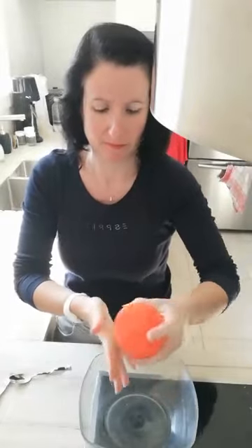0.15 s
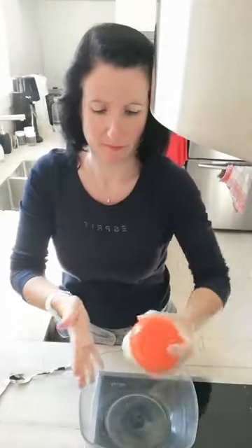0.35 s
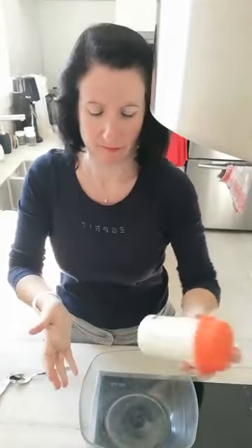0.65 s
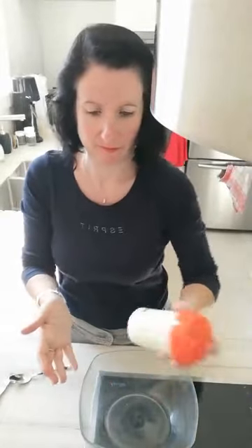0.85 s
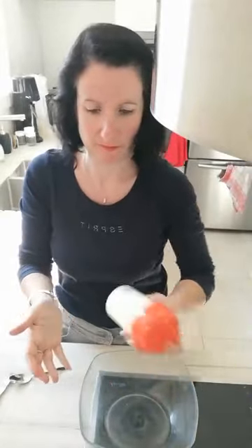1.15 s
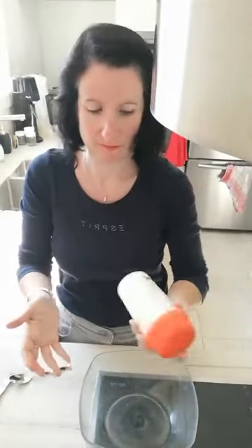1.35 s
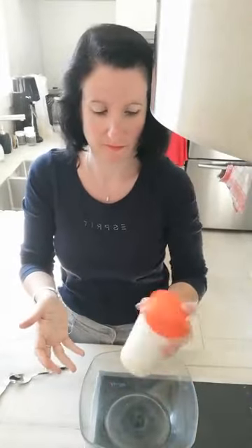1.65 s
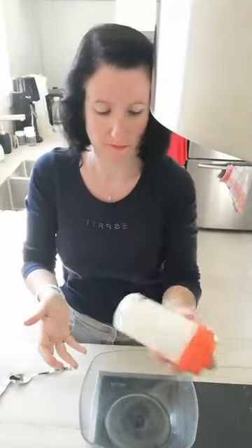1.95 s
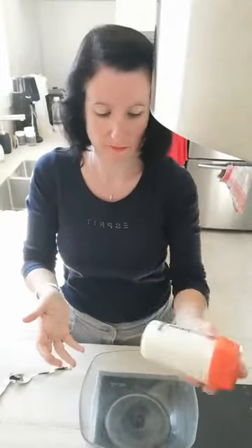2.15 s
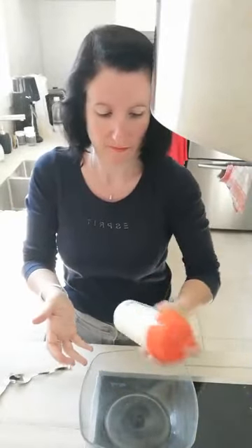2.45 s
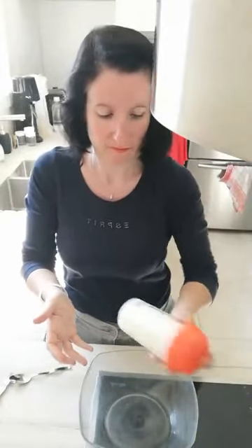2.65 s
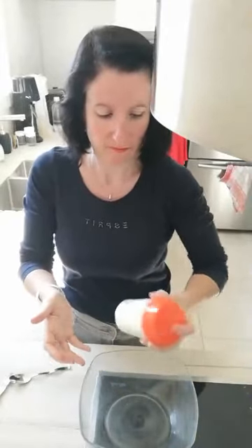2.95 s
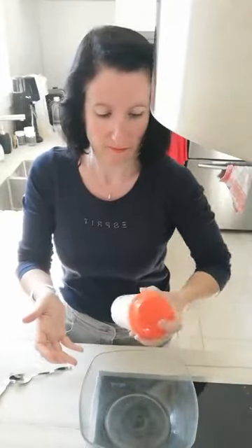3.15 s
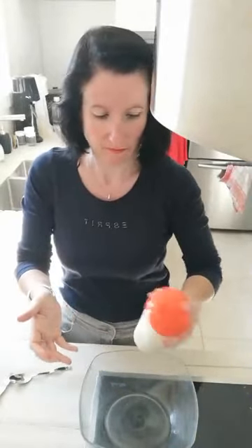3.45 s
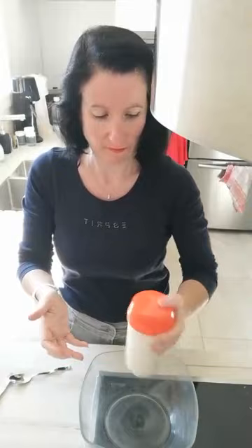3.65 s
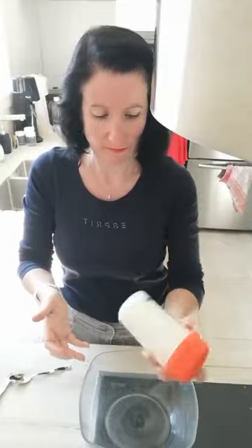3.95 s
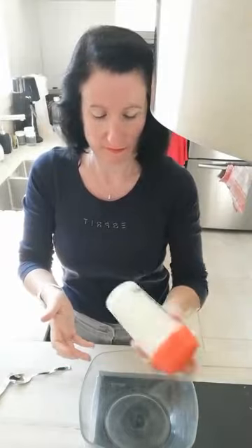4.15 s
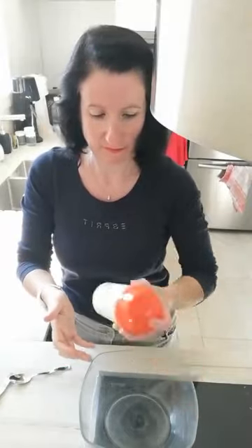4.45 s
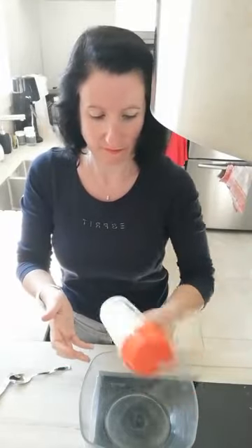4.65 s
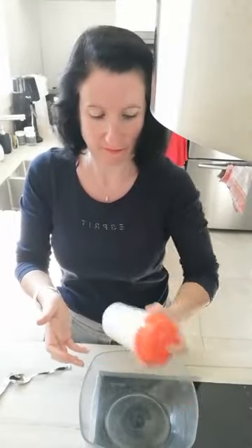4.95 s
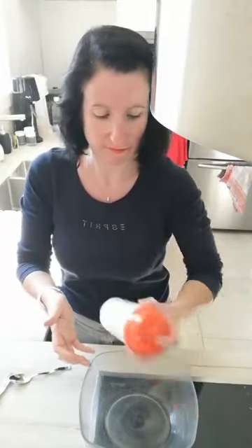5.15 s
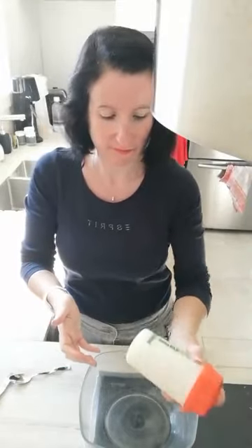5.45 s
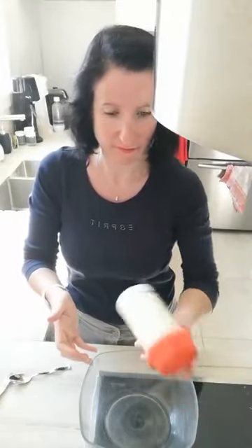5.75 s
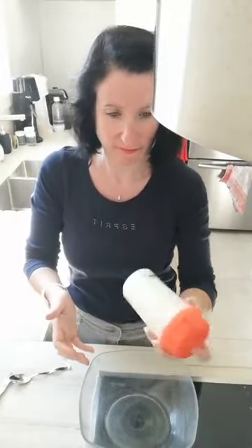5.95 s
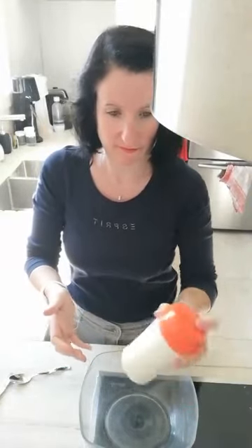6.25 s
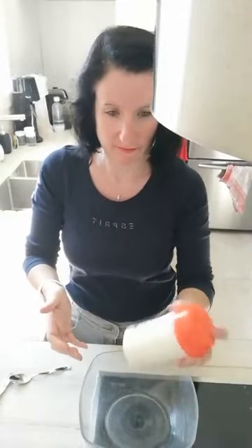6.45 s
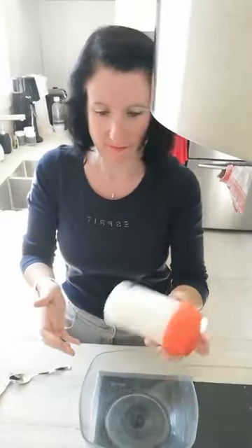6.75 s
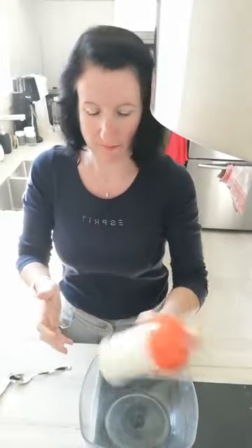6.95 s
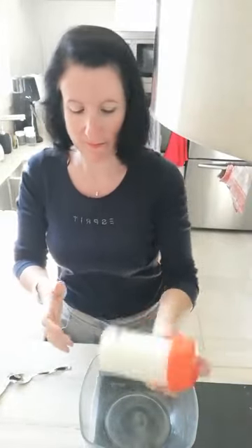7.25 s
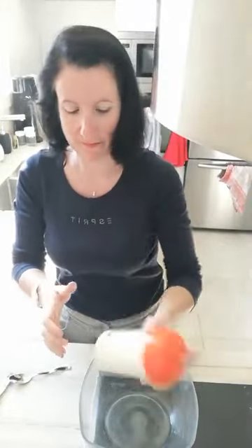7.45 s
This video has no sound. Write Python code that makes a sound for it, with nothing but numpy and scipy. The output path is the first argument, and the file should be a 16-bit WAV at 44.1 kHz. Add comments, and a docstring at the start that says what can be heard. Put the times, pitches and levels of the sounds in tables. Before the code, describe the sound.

Rapid wet sloshing inside a closed plastic bottle, with hollow knocks and fine spray, in a kitchen with a quiet appliance hum.

```python
"""A closed plastic shaker bottle is shaken by hand about five times a second in a kitchen.
From start to end an appliance hums on slightly wavering tones over shaped room noise. The first splash is
there at once; stroke after stroke, liquid breaks into spray made of random clicks and rising bubble chirps.
Sparse sharp ticks and sloshing wall modes join in, and from half a second on slugs of liquid knock out damped
tones of trapped air, some with a low thud. Near the end the splashes thin out briefly, then return."""
import sys
import numpy as np
from scipy import signal
from scipy.fft import rfft, irfft
from scipy.io import wavfile
from scipy.ndimage import uniform_filter1d

SR = 44100
rng = np.random.default_rng(int(sys.argv[2]) if len(sys.argv) > 2 else 0)


def unload_audio(sound):
    """Save the sound as a 16-bit wav file, at the path given as the first command line argument."""
    columns = np.transpose(np.atleast_2d(sound))
    # keep every value between -1 and 1, then stretch to whole-number steps
    steps = np.round(np.clip(columns, -1, 1) * 32767)
    wavfile.write(sys.argv[1], SR, steps.astype(np.int16))


N = 334426  # length [samples]

# appliance hum: (frequency [Hz], level [dB rms], waver [dB rms])
HUM_TONES = [(36, -68, 1.5), (100, -50.5, .35), (180.5, -62.5, 2), (200, -63.5, 1.5), (300, -70, 3)]
# spectrum of the room noise: (frequency [Hz], relative density [dB])
ROOM_NOISE_SPECTRUM = [(22, -18), (36, -1), (66, 8.5), (88, 4.5), (120, 9.5), (138, 3), (160, 12),
                       (235, -4.5), (320, -45), (700, 12), (1000, -9), (14400, -45)]
# liquid hitting an end of the bottle, one row a stroke: (peak time [s], level [dB], rise [s], fall [s])
SPLASHES = [(-0.0, -44.5, 0.0044, 0.039), (0.099, -39.5, 0.015, 0.068), (0.261, -50, 0.021, 0.046),
            (0.394, -45.5, 0.02, 0.15), (0.483, -45.3, 0.058, 0.084), (0.557, -39, 0.037, 0.11),
            (0.624, -41, 0.015, 0.013), (0.704, -41, 0.058, 0.05), (0.76, -39, 0.022, 0.093),
            (0.824, -51, 0.013, 0.046), (0.899, -42.5, 0.048, 0.087), (0.965, -36, 0.0066, 0.065),
            (1.1, -41.5, 0.033, 0.082), (1.179, -34, 0.0069, 0.047), (1.331, -40, 0.072, 0.029),
            (1.39, -44, 0.029, 0.046), (1.533, -40, 0.064, 0.045), (1.604, -41, 0.014, 0.033),
            (1.728, -44.5, 0.044, 0.019), (1.83, -48, 0.069, 0.02), (1.913, -43, 0.02, 0.019),
            (2.019, -46.5, 0.04, 0.049), (2.118, -41.5, 0.0087, 0.051), (2.196, -51.5, 0.031, 0.057),
            (2.266, -46.5, 0.068, 0.16), (2.39, -46.5, 0.081, 0.039), (2.458, -47.5, 0.031, 0.088),
            (2.565, -42, 0.067, 0.06), (2.699, -43, 0.031, 0.089), (2.798, -48.5, 0.031, 0.12),
            (2.914, -43, 0.08, 0.052), (3.017, -49, 0.021, 0.19), (3.112, -40, 0.031, 0.069),
            (3.263, -47.6, 0.02, 0.106), (3.366, -44.5, 0.046, 0.07), (3.484, -43.9, 0.057, 0.073),
            (3.606, -46.0, 0.036, 0.022), (3.727, -42, 0.027, 0.1), (3.834, -42.5, 0.038, 0.039),
            (3.951, -44.5, 0.038, 0.032), (4.037, -45, 0.036, 0.037), (4.14, -43, 0.03, 0.016),
            (4.224, -44.5, 0.015, 0.037), (4.331, -40, 0.0043, 0.019), (4.44, -45.7, 0.008, 0.011),
            (4.593, -47.5, 0.081, 0.043), (4.705, -47, 0.081, 0.1), (4.777, -39.5, 0.02, 0.036),
            (4.89, -41, 0.016, 0.042), (5.0, -45, 0.076, 0.046), (5.107, -40.5, 0.053, 0.055),
            (5.228, -44.2, 0.037, 0.026), (5.312, -42.5, 0.078, 0.057), (5.452, -45, 0.034, 0.068),
            (5.54, -42, 0.033, 0.055), (5.663, -45.8, 0.048, 0.066), (5.738, -45.0, 0.021, 0.15),
            (5.904, -40.5, 0.016, 0.023), (6.011, -44.5, 0.064, 0.053), (6.111, -40.5, 0.03, 0.04),
            (6.197, -48.5, 0.032, 0.11), (6.295, -48, 0.064, 0.038), (6.385, -43, 0.0043, 0.043),
            (6.505, -46, 0.036, 0.029), (6.607, -51, 0.068, 0.023), (6.705, -45.5, 0.02, 0.03),
            (6.783, -56, 0.069, 0.102), (6.857, -55, 0.008, 0.12), (7.012, -54, 0.091, 0.035),
            (7.067, -46.5, 0.016, 0.045), (7.173, -48, 0.013, 0.065), (7.256, -44.5, 0.025, 0.06),
            (7.354, -46.5, 0.015, 0.045), (7.458, -47.6, 0.089, 0.096), (7.536, -48.5, 0.01, 0.089)]
# swirl between the splashes: (time [s], spray level [dB], coarse drops over fine ones [dB])
# the last column also balances the splashes
SWIRL = [(0.0, -40.5, -16), (0.3, -66.5, -0.5), (0.45, -57, -0.6), (1.5, -48.5, -2), (2.2, -54, 2.2),
         (3.0, -49.5, 0.5), (3.699, -55, 0.5), (4.4, -49.5, -0.5), (5.0, -51, 2.5), (6.0, -55, 0),
         (7.0, -51.5, 1.7), (7.58, -69, -0.1)]
# level of the wall's ringing as the shaking grows and slackens: (time [s], level [dB])
WALL_VIGOUR = [(0, -43.5), (.35, -53), (.7, -47.5), (1.7, -50.5), (2.6, -48), (3.6, -48), (4.3, -46.5),
               (5.2, -48), (6.3, -46.5), (7.58, -48)]
# low modes of the bottle wall: (frequency [Hz], width of each of two passes [Hz], relative level [dB])
WALL_MODES = [(445.6, 111, -3.5), (616.7, 155, -1), (636, 62, -6.5), (743.4, 137, 10.5), (780, 32, 4.5)]
# single sharp ticks within the splashes: (time [s], nominal level [dB], pitch [Hz])
TICKS = [(0.096, -34, 4400), (0.48, -38, 1480), (0.763, -32, 2440), (1.180, -34, 1690), (2.799, -36, 3200),
         (6.381, -37.5, 1670), (6.399, -44, 1960)]
# partials of a tick: (multiple of the pitch [ratio], relative level [dB])
TICK_PARTIALS = [(1, -1), (1.25, -6.5), (1.9, -7)]
# slugs of liquid knocking the bottle: (peak time [s], ring of the trapped air [dB], low thud [dB])
KNOCKS = [(0.497, -35, -53), (0.601, -31.5, -63), (0.712, -38, -53), (0.79, -42, -53), (0.994, -40, -51),
          (1.187, -38, -70), (1.229, -39.5, -65), (1.405, -38, -71), (1.73, -45, -45), (1.916, -33, -46),
          (2.045, -34, -67), (2.389, -36, -46), (2.566, -39, -57), (2.596, -43, -45), (2.7, -31.5, -58),
          (2.939, -34, -52), (3.113, -42, -55), (3.167, -36.5, -54), (3.279, -37.5, -51), (3.364, -35, -73),
          (3.728, -43, -53), (3.803, -34.3, -50), (3.837, -31, -58), (3.959, -51.1, -44.5),
          (4.141, -57, -38.5), (4.338, -57, -42), (4.584, -39, -56), (4.667, -40, -52), (4.691, -39.5, -56),
          (4.779, -40, -53), (4.891, -33.5, -41.5), (4.989, -36.5, -70), (5.114, -34, -48.5),
          (5.144, -41, -64), (5.336, -29, -50), (5.466, -53, -46), (5.535, -35.1, -49), (5.571, -34, -56),
          (5.663, -38.5, -51), (5.767, -37.5, -51), (5.913, -38.5, -52), (6.002, -47, -54),
          (6.114, -36, -53), (6.354, -40, -56), (6.651, -38, -60), (6.813, -40, -62), (6.852, -39.5, -56),
          (7.258, -40, -58), (7.299, -43, -44.5)]
# what a knock rings: (frequency [Hz], level relative to the ring [dB], level relative to the thud [dB])
KNOCK_MODES = [(386.5, -45, 1), (465, -25, -6.5), (570.3, -11.5, -4), (757.6, -2, -26), (814.6, -9, -32)]
# spectrum of the droplet patter: (frequency [Hz], relative density [dB])
SPRAY_SPECTRUM = [(250, -21), (330, -17), (900, -20.5), (1060, -18.5), (1900, -20), (2730, -12.5),
                  (4500, -16), (6830, -19), (10300, -10), (12500, -16.5), (14400, -23.5)]
# higher wall modes struck by drops: (frequency [Hz], width [Hz], relative level [dB])
HIGH_WALL_MODES = [(1540, 620, -3), (2110, 117, -1), (6140, 470, 0)]

ROOM_NOISE_DB = -57.5
KNOCK_DETUNE = 0.02  # rms ratio; the air pocket changes size from knock to knock
KNOCK_RISE_S, KNOCK_T60_S = 0.00805, 0.0502  # rise time constant; decay by 60 dB at 750 Hz
REBOUND_S, REBOUND_DB = 0.02, -9.5  # the slug folds over and strikes once more
EDGE_HZ = 14330  # upper limit of the band


def gain_of(db):
    """Turns dB into an amplitude factor."""
    return 10 ** (np.asarray(db) / 20)


def evened(x):
    """Brings x to rms 1."""
    return x / np.sqrt(np.mean(x ** 2) + 1e-20)


def add(mix, s, sound):
    """Lays a sound into the mix from s seconds on, cut at the end of the mix."""
    part = mix[max(round(s * SR), 0):][:len(sound)]
    part += sound[:len(part)]


def coloured(x, points):
    """Weights the spectrum of x by points (Hz, dB), joined on a log frequency axis, at rms 1."""
    f, db = np.transpose(points)
    hz = np.fft.rfftfreq(len(x), 1 / SR)
    weight = gain_of(np.interp(np.log(hz + 1), np.log(f + 1), db))
    return evened(irfft(rfft(x) * weight, len(x)))


def ring(x, modes):
    """Sum of damped resonances (Hz, width Hz, dB) driven by x; a wider one dies sooner."""
    total = 0
    for hz, width, db in modes:
        pole = np.exp((2j * hz - abs(width)) * np.pi / SR)
        total = total + gain_of(db) * 2 * signal.lfilter([1 - abs(pole)], [1, -pole], x + 0j).imag
    return total


def drift(per_s):
    """Slow chance of rms 1 that changes about per_s times a second."""
    size = max(round(SR / per_s), 1)
    return evened(uniform_filter1d(uniform_filter1d(rng.standard_normal(N), size), size))


def droplets(per_s, spread_db):
    """Random clicks of either sign at rms 1; positive spread makes a few large, negative a few small."""
    size = gain_of(spread_db * np.minimum(rng.exponential(1, N), 4))
    sign = rng.choice([-1., 1.], N)
    return evened(size * sign * (rng.random(N) < per_s / SR))


def kitchen():
    """Appliance tones, each wavering a little in level, over room noise."""
    t = np.arange(N) / SR
    hum = np.zeros(N)
    for hz, db, waver_db in HUM_TONES:
        level = gain_of(db + waver_db * drift(5.2))
        hum += level * np.sqrt(2) * np.sin(2 * np.pi * (hz * t + rng.random()))
    return hum + gain_of(ROOM_NOISE_DB) * coloured(rng.standard_normal(N), ROOM_NOISE_SPECTRUM)


def room(x, t60=0.2):
    """A decaying tail of random reflections."""
    t = np.arange(SR // 2) / SR
    tail = rng.standard_normal(len(t)) * gain_of(-60 * t / t60) * (t > .004)
    return signal.fftconvolve(x, tail / np.linalg.norm(tail))[:N]


def strokes():
    """Amplitude of the fine and of the coarse spray: swirl plus the rise and fall of each splash."""
    s, spray_db, coarse_db = np.transpose(SWIRL)
    clock = np.arange(N) / SR
    power = gain_of(2 * np.interp(clock, s, spray_db))
    t = np.arange(SR // 2) / SR
    for at, db, rise, fall in SPLASHES:
        rise, fall = max(rise, .001), max(fall, .005)
        swell = np.minimum(t / rise, 1) ** 0.93
        decay = np.exp(-(np.maximum(t - rise, 0) / fall) ** 1.15)
        add(power, at - rise, (swell * decay * gain_of(db)) ** 2)
    fine = np.sqrt(power)
    return fine, fine * gain_of(np.interp(clock, s, coarse_db))


def wall():
    """Sloshing liquid keeps the low modes ringing; their pitch wanders as the air pocket changes shape."""
    _, coarse = strokes()
    vigour = gain_of(np.interp(np.arange(N) / SR, *np.transpose(WALL_VIGOUR)))
    drive = droplets(per_s=700, spread_db=1.5)
    modes = np.zeros(N)
    for hz, width, db in WALL_MODES:
        resonance = [(hz, width, 0)]
        modes += gain_of(db) * ring(ring(drive, resonance), resonance)
    # reading faster or slower bends the pitch
    warped = np.arange(N) + np.cumsum(.014 * drift(12))
    return vigour * evened(coarse) ** 0.66 * evened(np.interp(warped, np.arange(N), modes))


def ticks():
    """A click and two quick rebounds, each a noisy chord that dies by 60 dB in 36 ms."""
    out, t = np.zeros(N), np.arange(SR // 20) / SR
    for at, db, hz in TICKS:
        noise = rng.standard_normal(len(t))
        tone = sum(gain_of(mode_db) * np.sin(2 * np.pi * ratio * hz * t) for ratio, mode_db in TICK_PARTIALS)
        for late, rebound_db in [(0, -3), (.006, -15), (.017, -11)]:  # (s, dB)
            decay = gain_of(db + rebound_db - 60 * t / 0.036)
            add(out, at + late, decay * (tone + 0.2 * noise))
    return out


def blows():
    """Damped tones that swell as the slug lands; the wall damps low ones within fewer cycles."""
    out, t = np.zeros(N), np.arange(SR // 8) / SR
    for at, ring_db, thud_db in KNOCKS:
        bend = 1 + KNOCK_DETUNE * rng.standard_normal()
        for hz, to_ring_db, to_thud_db in KNOCK_MODES:
            t60 = KNOCK_T60_S * (hz / 750) ** 0.85
            shape = (1 - np.exp(-t / KNOCK_RISE_S)) ** 3 * gain_of(-60 * t / t60)
            size = np.hypot(gain_of(ring_db + to_ring_db), gain_of(thud_db + to_thud_db))
            tone = size * shape / shape.max() * np.sin(2 * np.pi * hz * bend * t)
            start = at - shape.argmax() / SR  # so that the swell peaks on time
            add(out, start, tone)
            add(out, start + REBOUND_S, gain_of(REBOUND_DB) * tone)
    return out


def patchy(x, depth_db):
    """Clusters of drops lift and lower patches some hundred Hz wide and tens of ms long."""
    z = signal.stft(x, nperseg=256, noverlap=192)[2]
    field = uniform_filter1d(rng.standard_normal(z.shape), size=4, axis=0)
    field = uniform_filter1d(field, size=14, axis=1)
    patched = signal.istft(z * gain_of(depth_db * evened(field)), nperseg=256, noverlap=192)[1]
    return evened(patched[:len(x)])


def bursts(per_s, t60, depth):
    """Level that jumps up at random moments and dies away: small slugs breaking on the wall."""
    t = np.arange(SR // 10) / SR
    decay = gain_of(-120 * t / t60)  # a power, hence twice 60 dB
    jumps = abs(signal.oaconvolve(droplets(per_s, spread_db=1) ** 2, decay)[:N])
    return evened(np.sqrt(1 + depth * jumps / np.mean(jumps)))


def bubbles():
    """Small bubbles chirp: decaying sines whose pitch climbs as the bubble nears the surface."""
    t, out = np.arange(600) / SR, np.zeros(N)
    for hz in np.geomspace(1500, 6000, num=14):
        turns = hz * t * (1 + 12 * t)
        chirp = np.sin(2 * np.pi * turns) * np.exp(-turns / 8) * np.minimum(turns / 3, 1)
        out += signal.oaconvolve(droplets(per_s=20, spread_db=-2.5), chirp)[:N]
    return evened(out)


def spray():
    """Droplets patter on the wall among bubble chirps; coarse drops carry the lower part."""
    fine, coarse = strokes()
    patter = coloured(droplets(per_s=9000, spread_db=-1), SPRAY_SPECTRUM)
    wall_hits = evened(ring(droplets(per_s=1500, spread_db=2.0), HIGH_WALL_MODES))
    patter = patter + gain_of(-10.0) * wall_hits + gain_of(-16) * bubbles()
    patter = patchy(patter, depth_db=1.5) * bursts(per_s=37, t60=0.095, depth=0.36)
    low = signal.sosfiltfilt(signal.butter(1, 4500, fs=SR, output="sos"), patter)
    return coarse * low + fine * (patter - low)


def scene():
    """The bottle, its reflections in the room and the kitchen behind, as one channel."""
    bottle = spray() + wall() + blows() + ticks()
    return (bottle + gain_of(-11) * room(bottle) + kitchen())[None]


def record(dry):
    """The band limit of the recorder: a steep low-pass."""
    lowpass = signal.firwin(1023, EDGE_HZ, window=("kaiser", 10), fs=SR)
    return signal.oaconvolve(dry, lowpass[None], "same")


dry = scene()
out = record(dry)
unload_audio(out)
```